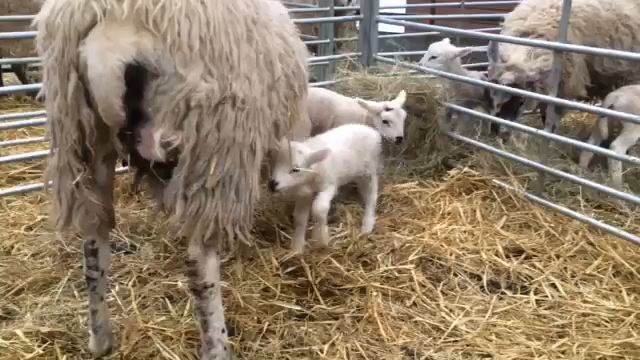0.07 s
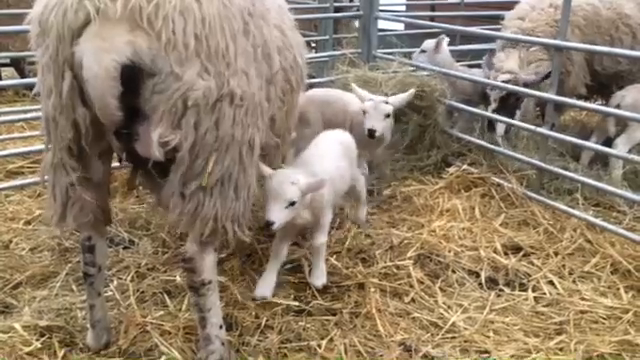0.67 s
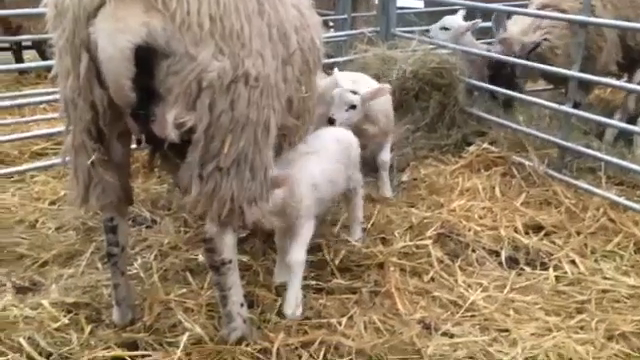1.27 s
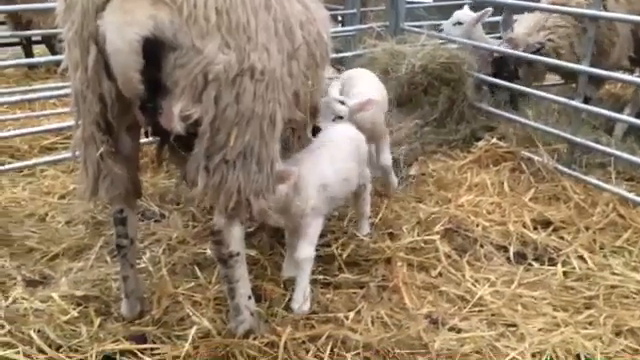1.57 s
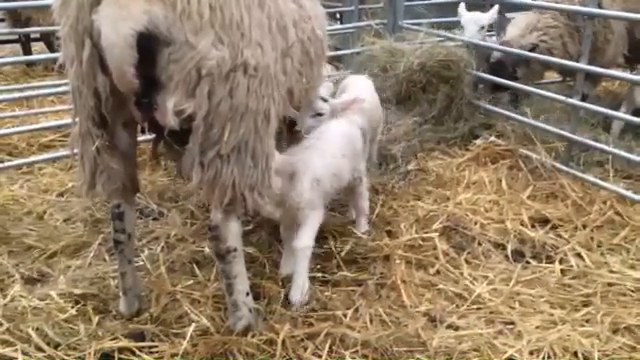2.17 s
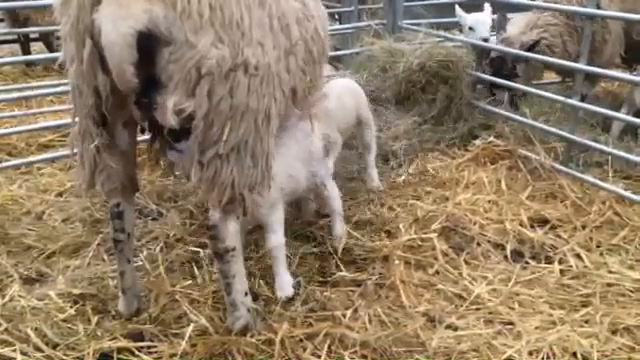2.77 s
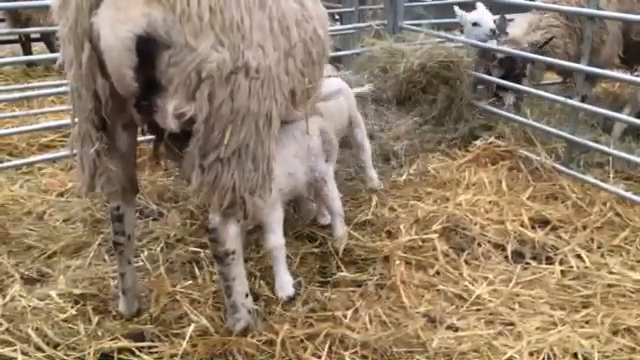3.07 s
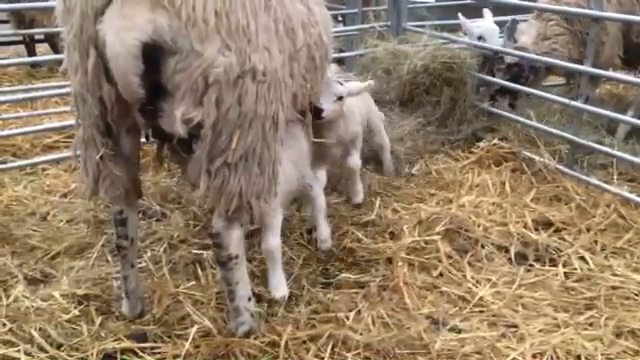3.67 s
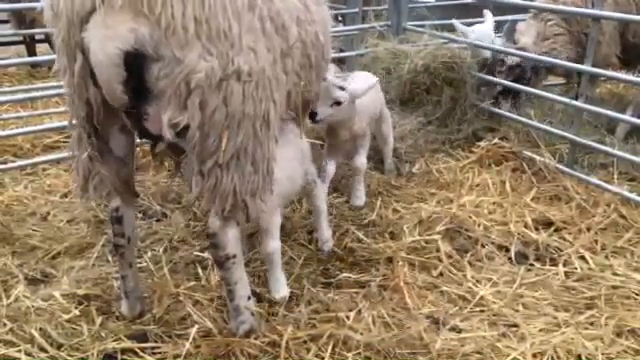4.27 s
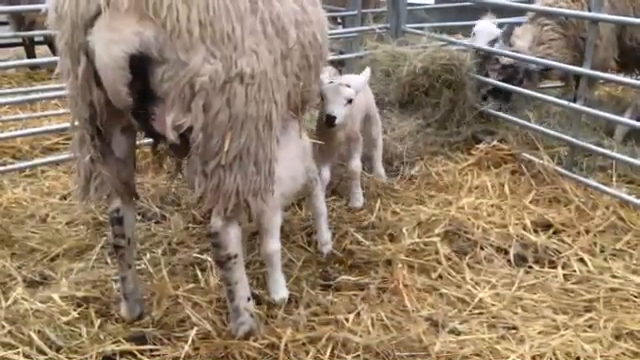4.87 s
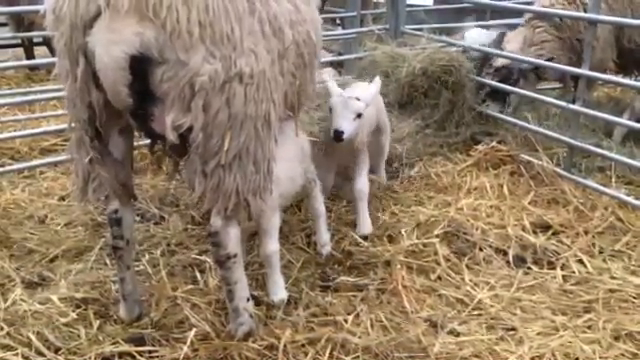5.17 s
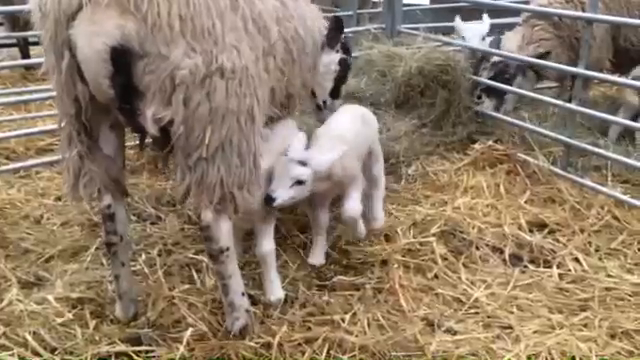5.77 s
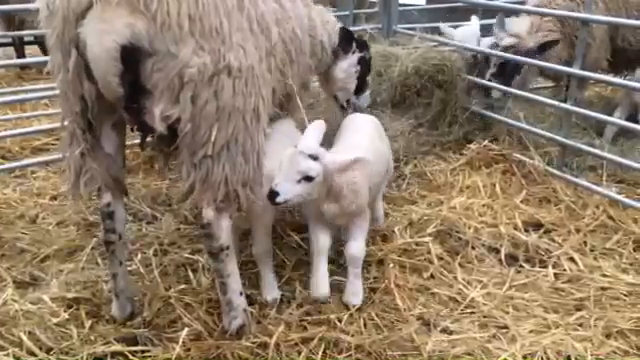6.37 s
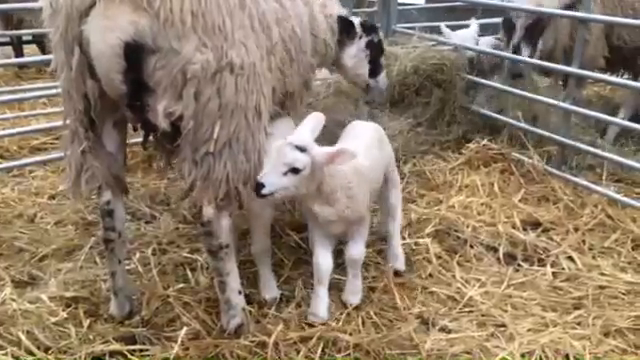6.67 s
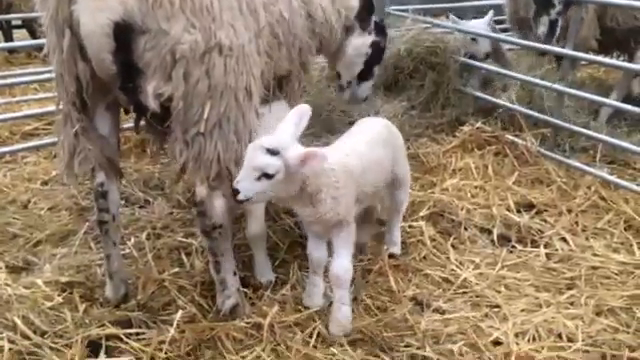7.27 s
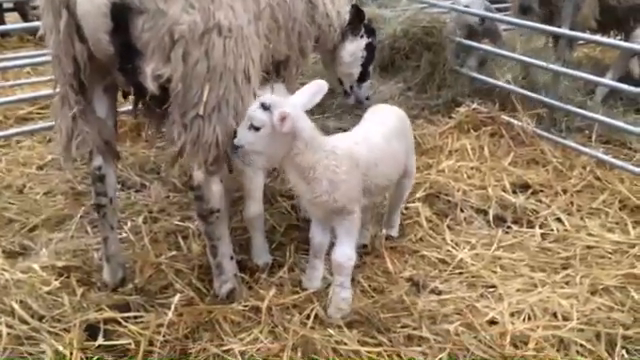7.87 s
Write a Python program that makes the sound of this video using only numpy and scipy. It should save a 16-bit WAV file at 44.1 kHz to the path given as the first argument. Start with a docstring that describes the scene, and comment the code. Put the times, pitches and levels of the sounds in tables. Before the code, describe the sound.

Dry straw rustles and snaps under a ewe and two lambs, with soft hoof thuds over a low barn rumble.

```python
"""Dry straw rustles and snaps under a ewe and two lambs, their hooves thudding softly on the bedding.
One small microphone stands close to the pen in a lambing barn, whose roof and walls add a short tail.
From the pens farther off come dull scrapes of animals on hurdles and troughs, and one faint ringing.
Behind it all lie a low rumble and the hum of a far machine; outside, tyre noise swells and fades
as a vehicle passes some 26 m away."""
import sys
import numpy as np
from scipy import signal
from scipy.fft import rfft, irfft, next_fast_len
from scipy.io import wavfile
from scipy.ndimage import map_coordinates

SR = 44100
rng = np.random.default_rng(int(sys.argv[2]) if len(sys.argv) > 2 else 0)


def generate_wav(signal):
    """Clip the signal to [-1, 1] and save it as 16-bit WAV at the path in sys.argv[1]."""
    frames = np.transpose(np.atleast_2d(signal))
    scaled = np.clip(frames, -1, 1) * 32767
    pcm = np.round(scaled).astype(np.int16)
    wavfile.write(sys.argv[1], SR, pcm)


N = 350154


def rustle():
    """Trodden straw close to the microphone: stalks rub in a hiss and slip in a fine crackle."""
    # The colour of dry straw. Each row: frequency in Hz, level in dB.
    spectrum = [(300, -9), (1000, -7), (2000, 7.5), (3300, 2.5), (4500, 1), (6000, 2.5), (7500, 3.5),
                (8900, 1.5), (9700, 3.3), (10500, -1)]
    # Feet find finer or coarser stalks. Each row: time in seconds, treble lift in dB.
    fineness = [(0.7, -1.5), (1.3, 5.5), (2.0, 2), (4.4, 2), (5.5, 7), (6.4, 5), (7.9, 9)]
    grains = crackle(count=6000, pitch_hz=6240, spread=0.42, cycles=1.9, size_db=3.0)
    rubbing = rng.standard_normal(N)
    straw = amp(1.8) * coloured(rubbing, spectrum) + amp(-4.0) * coloured(grains, spectrum)
    straw = unit(patchy(straw, width_hz=380, life_s=0.03, depth_db=1.5))
    coarse = filtered(straw, lambda hz: 1 / (1 + (hz / 7000) ** 6))
    fine = straw - coarse
    lift_db = curve(fineness)
    return amp(1.5) * stir() * (amp(-lift_db / 2) * coarse + amp(lift_db / 2) * fine)


def stir():
    """How hard the straw is stirred: each step presses in, eases and settles, over steady fidgeting."""
    # Steps and shuffles. Each row: start in seconds, length in seconds, relative level in dB.
    steps = [(0.074, 0.052, -66), (0.15, 0.052, -70), (0.263, 0.1, -59.5), (0.303, 0.028, -60),
             (0.412, 0.078, -58.5), (0.524, 0.019, -56), (0.71, 0.11, -64), (0.862, 0.03, -59),
             (0.975, 0.043, -64), (1.026, 0.043, -59.5), (1.158, 0.043, -61.5), (1.235, 0.097, -62.5),
             (1.345, .07, -65), (1.655, 0.11, -64.5), (1.8, .025, -56), (1.96, 0.054, -67),
             (2.097, 0.04, -62), (2.172, 0.061, -66), (2.25, 0.1, -61), (2.43, 0.13, -65.5),
             (2.672, 0.064, -62), (2.8, 0.05, -62), (2.858, 0.061, -59), (3.325, 0.13, -61),
             (3.463, 0.093, -64), (3.635, 0.075, -63), (3.71, 0.07, -57), (3.818, 0.058, -60),
             (3.894, 0.13, -65.5), (4.31, 0.06, -66), (4.373, 0.026, -61), (4.664, 0.057, -59),
             (5.221, 0.06, -59), (5.28, 0.065, -62.5), (5.644, .025, -66), (5.757, 0.066, -67),
             (6.05, 0.32, -76), (6.484, 0.035, -58.5), (6.53, 0.11, -63.5), (7.079, 0.087, -59.5),
             (7.185, 0.13, -66), (7.3, 0.07, -62.5), (7.412, 0.025, -62), (7.75, 0.021, -66)]
    # The flock fidgets between steps. Each row: time in seconds, relative level in dB.
    fidget = [(0.1, -60), (0.9, -63.5), (1.1, -66), (1.3, -63.5), (1.53, -68), (2.0, -65.5), (2.6, -62),
              (3.1, -66), (3.6, -63.5), (4.2, -67), (4.55, -64), (4.87, -68), (5.15, -66), (6.75, -63.5),
              (6.95, -65), (7.03, -69), (7.3, -66.5), (7.7, -67.5), (7.85, -71.5)]
    attack_s, sag_db, settle_t60_s = 0.008, 0.3, 0.12
    t = np.arange(SR) / SR
    power = amp(curve(fidget) + 0.25 * wobble(25)) ** 2
    for start_s, length_s, db in steps:
        press = np.minimum(t / attack_s, 1)
        eased_db = sag_db * np.minimum(t / length_s, 1)
        settled_db = 60 * np.maximum(t - length_s, 0) / settle_t60_s
        add(power, start_s, (press * amp(db - eased_db - settled_db)) ** 2)
    return np.sqrt(power)


def crackle(count, pitch_hz, spread, cycles, size_db):
    """Tiny slips of stalk on stalk: damped sines at random moments, mostly small, a few large."""
    moment, rarity, sustain = rng.random((count, 3)).T[:, :, None]
    hz = np.clip(pitch_hz * np.exp(spread * rng.standard_normal(count)), 800, SR / 3)[:, None]
    size = amp(-size_db * np.log(np.maximum(rarity, 0.01)))
    samples = np.arange(SR // 200)
    turns = hz * samples / SR
    grains = size * np.exp(-turns / (cycles * (0.5 + sustain))) * np.sin(2 * np.pi * turns)
    positions = (moment * N).astype(int) + samples
    return unit(np.bincount(positions.ravel(), grains.ravel(), N)[:N])


def snaps():
    """A stalk breaks with a tick, splits with a crack and rings briefly; its neighbours shiver after it."""
    # Single stalks. Each row: start in seconds, relative level in dB, pitch in Hz, ring strength in dB.
    stalks = [(0.1038, -50, 7700, 5), (0.112, -45, 6940, 10), (0.188, -42.5, 3700, 2),
              (0.313, -40, 9000, -4), (0.3244, -41, 6730, -5), (0.331, -44, 6800, -5),
              (0.449, -41, 6780, -6.5), (0.535, -40, 6640, -5), (0.542, -47, 6600, -3),
              (0.708, -45, 4500, -6), (0.8415, -38, 3010, -11), (0.992, -45, 6050, -6),
              (1.042, -46, 3020, -4), (1.796, -36.5, 7100, -6), (1.81, -40, 7700, 3),
              (2.159, -46, 10200, -1), (2.2635, -44, 3210, -4), (2.283, -44, 3350, -3),
              (2.304, -48, 3020, 1), (2.474, -41.5, 5130, -2), (2.489, -47, 3840, -3),
              (2.552, -40, 5210, -4), (2.6994, -49, 5980, 0), (2.715, -47, 5930, 8), (2.729, -49, 5920, 6),
              (2.879, -45, 6870, -4), (3.338, -42, 3230, -2), (3.364, -40, 5910, -3), (3.424, -47, 6470, 4),
              (3.549, -39, 3030, -4), (3.7056, -42, 8030, 0), (3.722, -40.5, 5500, -3),
              (3.744, -38, 5170, -4), (3.773, -38, 7670, -8), (3.812, -42, 6090, -2), (3.835, -43, 5660, 3),
              (3.976, -46, 5820, -3), (3.994, -43, 3580, -2), (4.423, -47, 7000, 5),
              (4.836, -42.5, 7000, -13), (5.1614, -44, 3060, -2), (5.2584, -37, 4360, -4),
              (5.319, -44, 7080, -1), (5.533, -39.5, 9300, -4), (5.667, -36, 3550, 1),
              (5.669, -42, 6540, 3), (6.119, -42, 3860, -7), (6.2394, -43, 3810, -3), (6.262, -53, 3200, 5),
              (6.366, -40, 3140, -5), (6.499, -41, 8350, -1), (6.706, -44, 8640, 6),
              (7.2295, -39, 3440, -7), (7.386, -41.5, 9260, 4.5), (7.4217, -46, 7460, -3),
              (7.66, -41.5, 3520, -4)]
    tick_t60_s, crack_t60_s, shiver_t60_s, ring_t60_s = 0.0032, 0.012, 0.1, 0.05
    track, t = np.zeros(N), np.arange(SR // 10) / SR
    onset = 1 - np.exp(-t / 0.0002)
    tick = amp(1 - 60 * t / tick_t60_s)
    crack = amp(-2.5 - 60 * t / crack_t60_s)
    shiver = amp(-5.5 - 60 * t / shiver_t60_s)
    for start_s, db, hz, ring_db in stalks:
        noise = rng.standard_normal(len(t))
        burst = unit(noise + 1.5 * resonance(noise, hz, q=1)) * (tick + crack + shiver)
        drift = np.cumsum(rng.normal(0, 0.21, len(t)))  # a split stalk rings impurely
        ring = amp(ring_db + 0.5 - 60 * t / ring_t60_s) * np.sin(2 * np.pi * hz * t + drift)
        add(track, start_s, amp(db - 14) * (burst + ring) * onset)
    return filtered(track, lambda hz: 1 - 1 / (1 + (hz / 2500) ** 4))


def thuds():
    """Hooves and bodies bump on soft bedding: a dull push of two or three cycles and a short scuff."""
    # Bumps in the near pen. Each row: start in seconds, relative level in dB, pitch in Hz.
    bumps = [(0.099, -30, 73.6), (0.318, -32, 176), (0.383, -32, 99), (0.399, -34.5, 90),
             (1.026, -31.5, 75.6), (1.36, -32.5, 95), (1.422, -29.5, 85), (1.575, -32, 62.3),
             (1.829, -29.5, 72), (2.268, -31.5, 143), (2.716, -32.5, 191), (2.764, -31, 172),
             (3.824, -32, 94), (4.244, -29, 85), (4.314, -34.5, 110), (4.415, -30, 297), (4.454, -33, 102),
             (4.509, -32.5, 66), (4.876, -35, 98), (5.166, -29.5, 260), (5.279, -36, 131),
             (5.369, -35.5, 95), (5.877, -32, 75.4), (6.697, -29.5, 147)]
    # The colour of a scuff. Each row: frequency in Hz, level in dB.
    scuff_spectrum = [(100, -13), (350, 2), (900, -13), (3000, -13), (9000, -27)]
    scuff_t60_s = 0.055
    push, contact, t = np.zeros(N), np.zeros(N), np.arange(SR // 5) / SR
    for start_s, db, hz in bumps:
        turns = hz * t
        envelope = turns / 0.69 * np.exp(1 - turns / 0.4)
        add(push, start_s, amp(db) * envelope * np.sin(2 * np.pi * turns))
        hardness = hz / 200  # harder contacts scuff more
        add(contact, start_s, hardness * amp(db - 21.5 - 60 * t / scuff_t60_s))
    push = signal.sosfilt(signal.butter(2, 38, "highpass", fs=SR, output="sos"), push)
    return push + contact * coloured(rng.standard_normal(N), scuff_spectrum)


def scrapes():
    """Farther off, animals brush hurdles and troughs: each rub briefly excites one broad resonance."""
    # Each row: start in seconds, length in seconds, relative level in dB, pitch in Hz of one rub.
    rubs = [(0.278, 0.26, -62.5, 1790), (0.907, 0.012, -52, 1290), (1.238, 0.055, -55.5, 410),
            (2.219, 0.084, -61, 610), (2.868, .04, -54, 1000), (3.119, 0.054, -56.5, 1500),
            (3.189, 0.062, -61, 810), (3.59, 0.027, -58, 1350), (3.788, 0.035, -59, 930),
            (5.244, 0.044, -52, 1300), (5.75, 0.029, -51, 940), (6.237, 0.029, -62, 3000)]
    attack_s, t60_s = 0.0045, 0.16
    track, t = np.zeros(N), np.arange(SR // 4) / SR
    for start_s, length_s, db, hz in rubs:
        friction = resonance(rng.standard_normal(len(t)), hz, q=1)
        rub = unit(resonance(friction, hz, q=3.5))
        fade_db = 60 * np.maximum(t - length_s, 0) / t60_s
        add(track, start_s, rub * np.minimum(t / attack_s, 1) * amp(db - 1 - fade_db))
    return track


def ringing():
    """A thin ringing from the far pens: narrow, fuzzy partials rise once, barely above the background."""
    # Its partials. Each row: frequency in Hz, relative level in dB.
    partials = [(2293, 5), (2450, -4), (2520, -4)]
    half_width_hz = 16

    def response(hz):
        return sum(amp(db) / (1 + ((hz - peak_hz) / half_width_hz) ** 2) for peak_hz, db in partials)

    ring = unit(filtered(rng.standard_normal(N), response))
    return amp(-67) * swell(start_s=7.08, length_s=0.46) * ring


def barn(x):
    """Roof and walls answer with a short diffuse tail."""
    # The barn's reverberation. Each row: frequency in Hz, time to fall 60 dB in seconds.
    decay = [(200, 0.53), (3000, 0.24), (10000, 0.25)]
    hz, t, bands = signal.stft(rng.standard_normal(SR // 2), SR, nperseg=256)
    tail = signal.istft(bands * amp(-60 * t / along(decay, hz)[:, None]), SR, nperseg=256)[1]
    return signal.fftconvolve(x, tail / np.linalg.norm(tail))[:N]


def outside():
    """Steady rumble and far road wash; a passing vehicle's engine and tyres fall off as 1 / distance."""
    # The colours of the rumble and of tyres on the road. Each row: frequency in Hz, level in dB.
    rumble_spectrum = [(15, -40), (32, -20), (50, -2), (75, -3), (105, 1), (130, -2.5), (175, -1.66),
                       (215, -4), (260, -9), (400, -17), (650, -22.5), (1500, -29), (4000, -41.5),
                       (11000, -59)]
    tyre_spectrum = [(200, -17.5), (450, -7.5), (650, -1.5), (820, -1), (960, 1.5), (1220, -1.5),
                     (1550, -2), (2000, -7.5), (2700, -14.5), (4000, -19.5), (7000, -25.5), (11000, -47)]
    nearest_s, distance_m, speed_m_per_s = 5.85, 26, 14.2
    tyre_db, engine_db = -51, -52  # the vehicle at its nearest
    rumble_db, far_road_db = -47.5, -59.5
    nearness = distance_m / np.hypot(distance_m, speed_m_per_s * (np.arange(N) / SR - nearest_s))
    rumble_gain = np.hypot(amp(rumble_db), amp(engine_db) * nearness) * amp(0.74 * wobble(14))
    dip_db = -1.8 * swell(start_s=6.5, length_s=0.35)  # the roar dips briefly
    tyre_gain = np.hypot(amp(far_road_db), amp(tyre_db) * nearness) * amp(dip_db + 0.89 * wobble(9))
    roar = patchy(rng.standard_normal(N), width_hz=130, life_s=0.04, depth_db=1.9)
    churn = patchy(rng.standard_normal(N), width_hz=90, life_s=0.06, depth_db=1.1)
    return rumble_gain * coloured(churn, rumble_spectrum) + tyre_gain * coloured(roar, tyre_spectrum)


def machine():
    """A far machine: a deep drone that comes and goes, under faint, unsteady higher tones."""
    # The higher tones. Each row: frequency in Hz, starting level in dB, drift in dB per second.
    tones = [(112.1, -64, 0), (144.6, -59.5, -1), (194, -64, 1), (241.4, -73.5, 0), (289.4, -72, 0),
             (944, -74.5, 0.5), (1341, -73, 0), (1738, -76.5, 0), (1785, -74, 0), (5944, -97, -0.5)]
    # The drone fades or swells. Each row: start in seconds, length in seconds, gain in dB.
    drone_swells = [(0, 0.8, -21), (2, 0.8, -6), (6.775, 0.2, 12.5), (7.397, 0.24, 5.5)]
    drone_hz, drone_db = 64.7, -55.5
    t = np.arange(N) / SR
    hum = sum(amp(db + drift * t + 2.7 * wobble(3)) * tone(hz + 0.783 * wobble(5))
              for hz, db, drift in tones)
    swell_db = sum(db * swell(start_s, length_s) for start_s, length_s, db in drone_swells)
    drone = amp(drone_db + swell_db + 1.2 * wobble(10)) * tone(drone_hz + 2.65 * wobble(9))
    return hum + drone


def amp(db):
    """Decibels to gain."""
    return 10 ** (np.asarray(db) / 20)


def unit(x):
    """Scale to rms 1."""
    return x / np.sqrt(np.mean(x ** 2) + 1e-20)


def along(points, hz):
    """(Hz, value) points read on a log frequency axis."""
    point_hz, values = np.transpose(points)
    return np.interp(np.log(hz + 1), np.log(point_hz), values)


def curve(points):
    """(seconds, value) points joined into one value per sample."""
    return np.interp(np.arange(N) / SR, *np.transpose(points))


def wobble(rate):
    """A smooth random curve, rate knots a second."""
    knots = rng.standard_normal(1000)
    grid = np.arange(0, N + 64, 64)
    return np.interp(np.arange(N), grid, map_coordinates(knots, [grid * rate / SR], mode="wrap"))


def swell(start_s, length_s, edge_s=0.07):
    """Rise from 0 to 1, hold, and fall back."""
    t = np.arange(N) / SR - start_s
    return np.clip(np.minimum(t, length_s + edge_s - t) / edge_s, 0, 1)


def tone(hz):
    """A sine of rms 1 that follows a pitch curve."""
    return np.sqrt(2) * np.sin(2 * np.pi * np.cumsum(hz) / SR)


def resonance(x, hz, q):
    """x through one resonant peak."""
    return signal.lfilter(*signal.iirpeak(hz, q, SR), x)


def filtered(x, response):
    """x through a gain that depends on frequency."""
    size = next_fast_len(N + SR // 2)
    return irfft(rfft(x, size) * response(np.fft.rfftfreq(size, 1 / SR)), size)[:N]


def coloured(x, spectrum):
    """x through a (Hz, dB) spectrum, at rms 1."""
    return unit(filtered(x, lambda hz: amp(along(spectrum, hz))))


def patchy(x, width_hz, life_s, depth_db):
    """Make x flicker with random patches of gain over frequency and time."""
    size, hop = 512, 128
    bands = signal.stft(x, nperseg=size, noverlap=size - hop)[2]
    bins, frames = np.indices(bands.shape)
    knots = rng.standard_normal((200, 600))
    patches = map_coordinates(knots, [bins * SR / size / width_hz, frames * hop / SR / life_s], mode="wrap")
    return signal.istft(bands * amp(depth_db * patches), nperseg=size, noverlap=size - hop)[1][:N]


def add(track, start_s, sound):
    """Mix a sound into the track at start_s."""
    part = track[max(round(start_s * SR), 0):][:len(sound)]
    part += sound[:len(part)]


def scene():
    """The pen close by, the other pens farther off, the barn around them and the background behind."""
    pen = rustle() + snaps() + thuds()
    far_pens = scrapes() + ringing()
    reverberation = barn(amp(-11.5) * pen + amp(-11) * far_pens)
    return (pen + far_pens + reverberation + outside() + machine())[None]


def record(dry):
    """The small microphone by the pen opens a moment late and keeps nothing above its band limit."""
    open_s, top_hz = 0.083, 10780
    opened = np.arange(N) / SR >= open_s
    return filtered(dry[0] * opened, lambda hz: np.clip((top_hz - hz) / 400 + 0.5, 0, 1))[None]


dry = scene()
out = record(dry)
generate_wav(out)
```